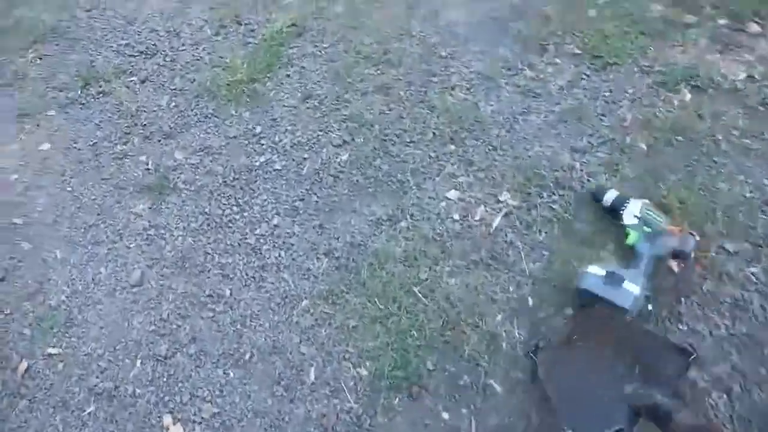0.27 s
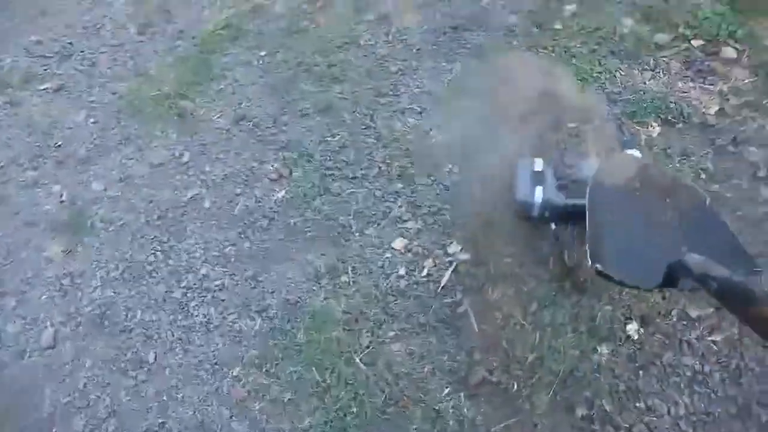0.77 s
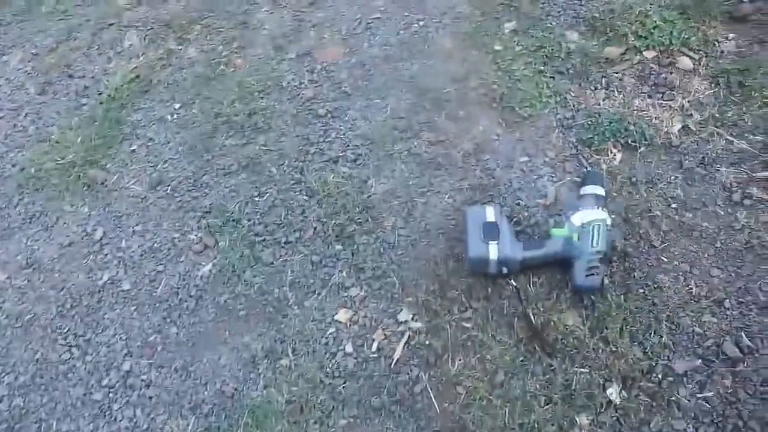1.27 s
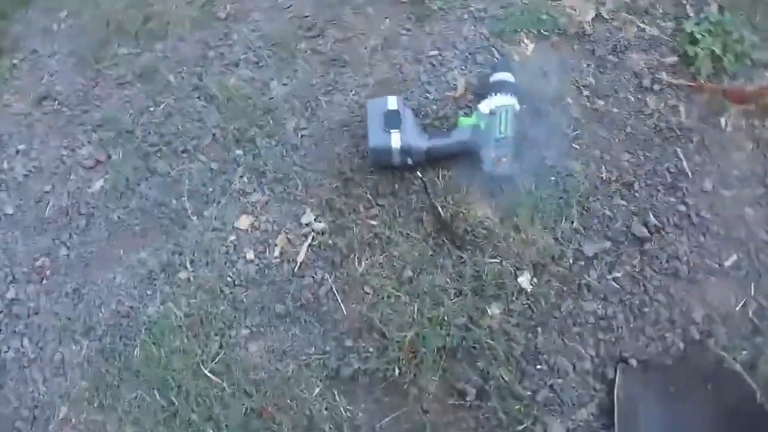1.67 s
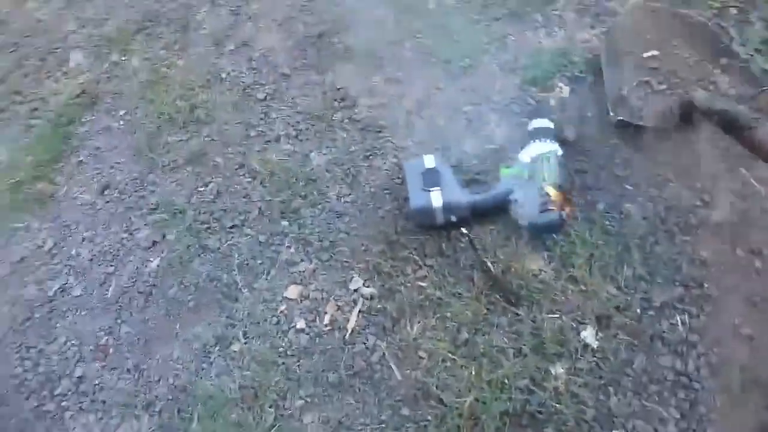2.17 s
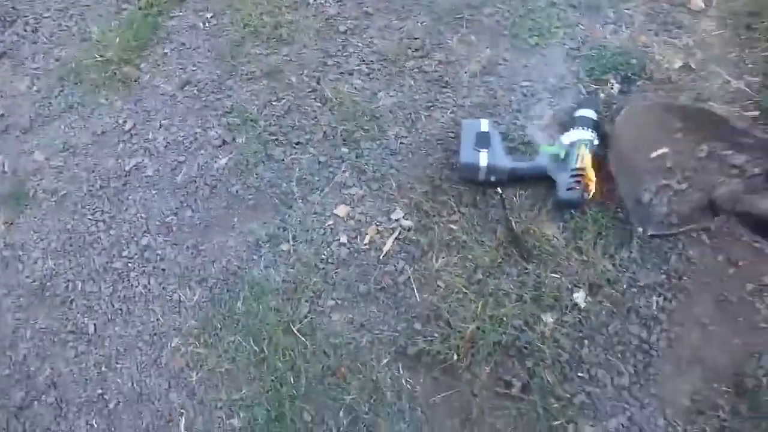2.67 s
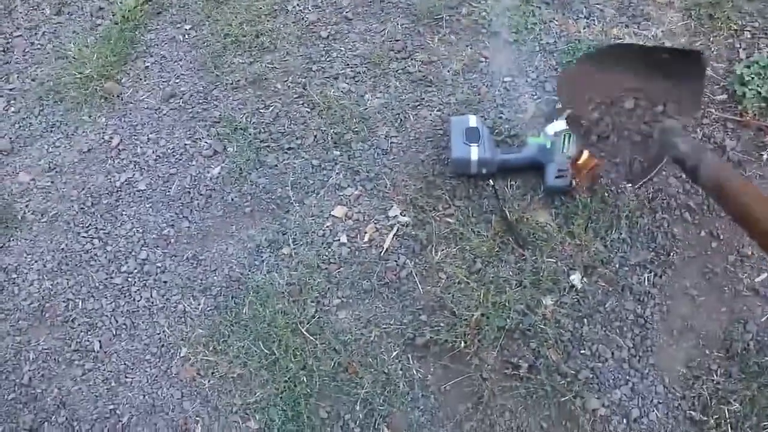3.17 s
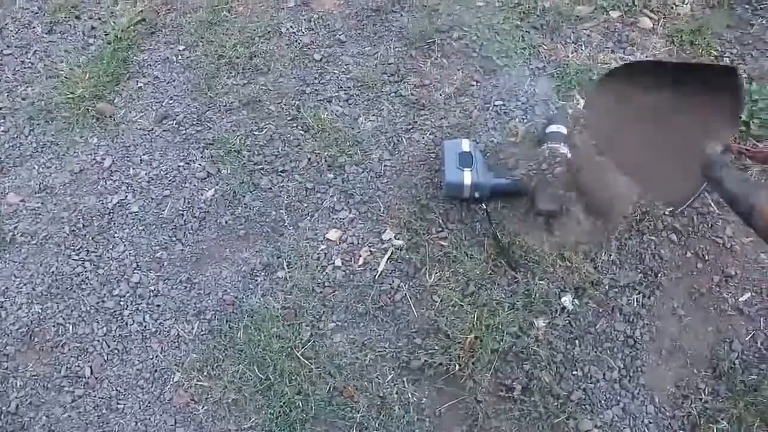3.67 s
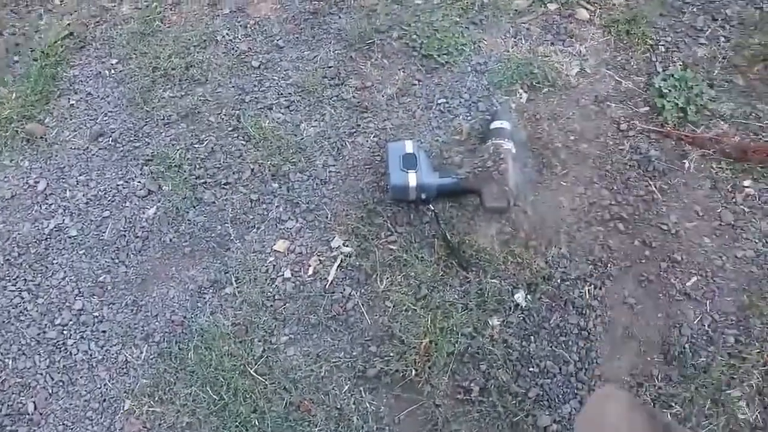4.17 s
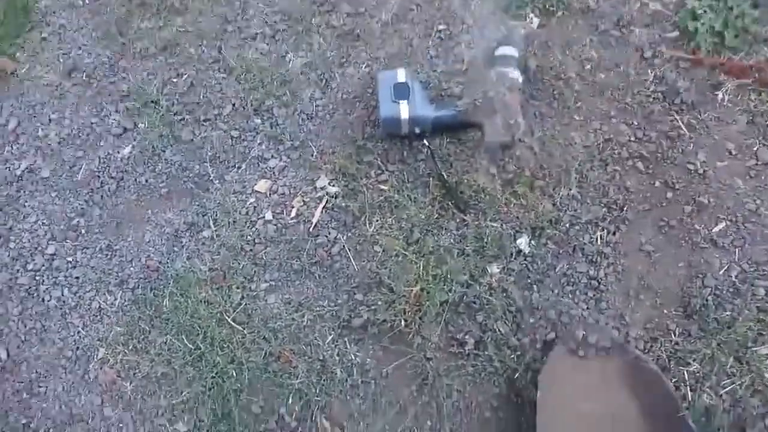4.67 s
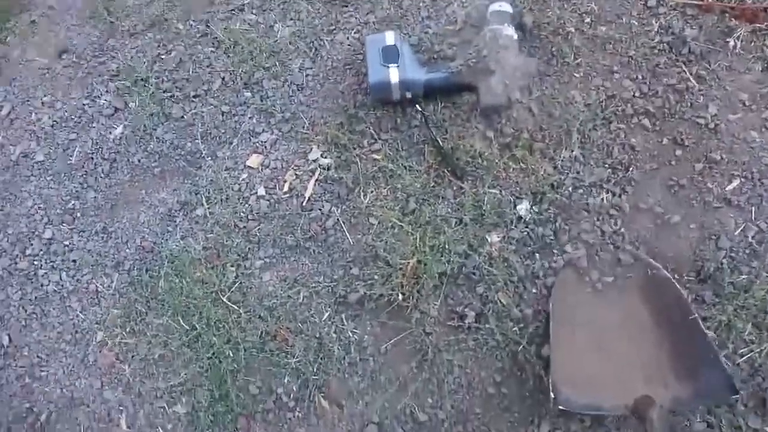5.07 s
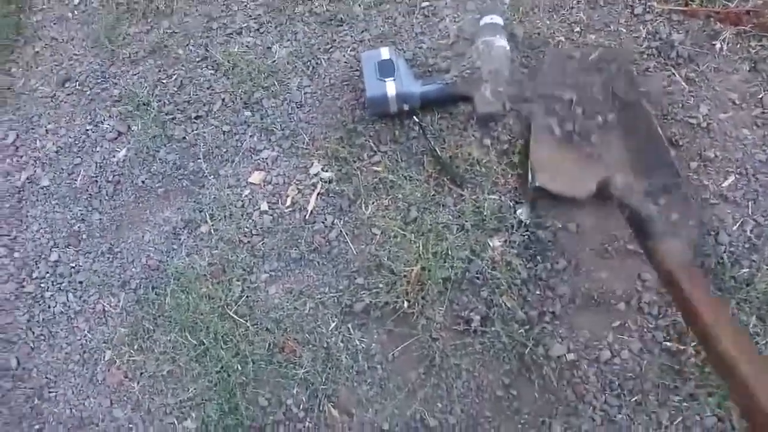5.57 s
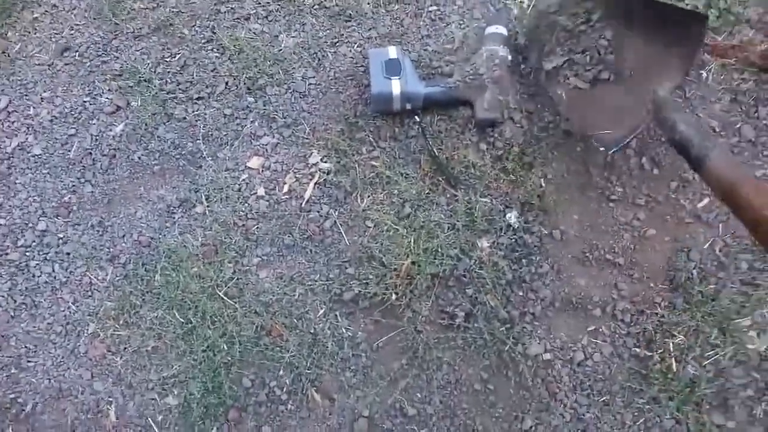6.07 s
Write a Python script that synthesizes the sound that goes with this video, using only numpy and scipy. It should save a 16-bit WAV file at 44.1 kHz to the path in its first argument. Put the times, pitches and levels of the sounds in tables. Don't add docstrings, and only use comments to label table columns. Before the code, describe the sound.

Close up in a quiet yard, soft soil thuds lead into a sharp clank as a steel shovel hits a hard object. Dirt spills, then the blade grinds and clatters through gravel. After a lull of crunching soil, ticking pebbles and a faint metallic ring, harder thrusts bite the ground, ending in a loud scraping clang and a thin trickle. Wind gently buffets the microphone.

```python
import sys
import numpy as np
from scipy import signal
from scipy.fft import rfft, irfft
from scipy.io import wavfile

SR = 44100
rng = np.random.default_rng(int(sys.argv[2]) if len(sys.argv) > 2 else 0)


def ratio_of_db(decibels):
    return 10 ** (np.asarray(decibels, float) / 20)


def master_out(mix):
    frames = np.transpose(np.atleast_2d(mix))
    ceiling = np.clip(frames, -1, 1)
    pcm = np.round(ceiling * 32767).astype(np.int16)
    wavfile.write(sys.argv[1], SR, pcm)


N = 278037


# (time [s], peak level [dB], burst t60 [s], grit against peak [dB])
STONE_JAMS = [(0.395, -19.5, 0.082, -2), (0.433, -16.5, 0.13, -9), (0.455, -11.5, 0.037, -13),
              (0.494, -17.5, 0.078, 1), (0.966, -27, 0.18, -20), (1.011, -27, 0.062, -14),
              (1.371, -20, 0.029, -12.5), (1.463, -25, 0.27, 1.5), (1.535, -5, 0.0072, -25),
              (1.562, -9, 0.079, -7.5), (1.597, -13, 0.22, -8.5), (1.643, -11, 0.022, 3),
              (1.72, -15, 0.099, -20), (1.74, -17, 0.039, -7), (0.584, -19.5, 0.056, -28),
              (0.639, -26, 0.058, -22), (0.994, -33, 0.025, -2), (2.174, -24, 0.017, 12),
              (1.816, -21, 0.13, -16.5), (1.867, -12, 0.024, -14), (1.888, -11, 0.074, -8),
              (1.95, -9, .15, -15.5), (2.022, -8.5, 0.082, -13.5), (2.056, -20.5, 0.18, 0.5),
              (2.277, -32, 0.045, 9), (2.686, -26, 0.053, -9.5), (3.511, -45, 0.066, 8),
              (3.631, -38, 0.012, 2), (4.568, -6.5, 0.16, -8), (4.607, -7, 0.05, -2.5),
              (4.652, 2, 0.014, -6.5), (4.739, -12.5, 0.013, -1.5), (4.948, -26, 0.08, -9),
              (4.993, -4, 0.05, -19), (5.039, -4, 0.088, -8), (5.574, 0.5, 0.062, -9.5),
              (5.552, -14.5, .05, -9.5), (5.646, -12, 0.02, -6.5), (5.828, -42, 0.083, 14),
              (5.858, -41, 0.18, 6.5), (5.887, -29.5, 0.12, -5), (2.102, -13, 0.035, -6),
              (4.664, -10.5, .03, 0)]
# (time [s], peak level [dB], burst t60 [s])
SOIL_JOLTS = [(0.091, -31.5, 0.099), (0.107, -28, 0.4), (0.3426, -5, 0.089), (0.408, -3, 0.0081),
              (0.528, -12, 0.075), (0.769, -13, 0.025), (0.791, -16, 0.0066), (0.833, -35.5, 0.038),
              (.857, -37, 0.062), (0.986, -17.5, 0.081), (1.079, -25, 0.05), (1.147, -13, 0.0079),
              (2.715, -38.5, 0.062), (2.759, -25, 0.19), (3.58, -21, 0.012), (3.659, -16.5, 0.019),
              (4.98, -22, 0.025), (5.484, -19.5, 0.03), (5.509, -9, 0.07), (5.587, 6.5, 0.046),
              (5.618, 0.5, 0.07), (5.682, -1.5, 0.1), (5.724, 3, 0.022), (5.803, -7, 0.017)]
# (start [s], swell [s], fade [s], peak level [dB], steel against soil [dB])
SLIDES = [(.095, 0.03, 0.38, -39, -24), (.19, 0.077, 0.3, -64, 5), (.397, 0.14, 0.096, -37, 2.5),
          (.57, 0.091, 0.32, -43, -2.5), (.78, 0.11, 0.2, -42.5, -22), (.96, 0.035, 0.95, -52.5, -19),
          (1.37, 0.02, 0.097, -36.5, -14), (1.45, 0.21, 0.19, -37, 5), (1.68, 0.06, 0.021, -41, -2),
          (1.78, 0.12, 0.68, -34, -5.5), (1.95, 0.11, 0.38, -35.5, 15), (2.16, 0.019, 0.24, -57, 9.5),
          (2.44, 0.12, 0.98, -50, -10), (2.67, 0.087, 0.2, -37, -23), (2.85, 0.27, 1, -53.5, -18.5),
          (3.345, 0.22, 0.68, -53.5, -1), (3.51, 0.036, 0.45, -57.5, 3), (4.68, 0.029, 1, -50.5, 3),
          (5.1, 0.013, 0.22, -49.5, -11), (5.28, 0.048, 0.17, -50.5, -11.5), (5.4, 0.083, .05, -54.5, -3),
          (5.75, 0.05, 0.17, -38.5, 0), (5.9, 0.069, 0.13, -51, -4.5), (6.0, 0.056, 0.39, -55, -21)]
# (start [s], swell [s], fade [s], peak level [dB], steel against soil [dB])
THRUSTS = [
    (4.57, 0.028, 0.056, -20, 1),
    (4.982, 0.072, 0.034, -23, 0.5),
    (5.485, 0.127, 0.14, -26, -2.5),
]
# (frequency [Hz], density [dB per Hz])
SOIL_COLOUR = [(71, -22.5), (120, -38), (216, -19), (255, -1), (348, 5.5), (870, -3.5), (1060, 4),
               (6000, -22.5), (7800, -66), (13200, -120)]
# (frequency [Hz], density [dB per Hz])
GRIT_COLOUR = [(1470, -30.5), (2500, 1.5), (4290, -2), (4750, -1), (7350, -5), (8870, -8.5), (15300, -15),
               (16300, -29.5)]


def shovel():
    judder = ratio_of_db(2.9 * drift(65))
    sliding = strokes(SLIDES, swell_db=11, fade_db=39.5, release_s=0.084)
    sliding = sliding + strokes(THRUSTS, swell_db=10.5, fade_db=5.5, release_s=0.011)
    on_steel, on_soil, on_grit = sliding
    steel_share = (on_steel + 1e-9) / (on_steel + on_soil + 2e-9)

    jolt_grit_db = -25
    impacts = STONE_JAMS + [(*jolt, jolt_grit_db) for jolt in SOIL_JOLTS]
    s, peak_db, t60, bright_db = np.transpose(impacts)
    pressure = judder * (on_steel + on_soil) + bursts(s, peak_db - 13.5, t60, rise_s=0.0018)
    grit_pressure = judder * on_grit + bursts(s, peak_db + bright_db - 5.0, t60, rise_s=0.00056)

    force = pressure * steel_share * grains(per_s=3000, spread_db=4.5, smooth=0.88)
    is_free = np.searchsorted((4.56, 5.3), np.arange(N) / SR) != 1
    steel = loaded_blade(force) + ratio_of_db(-36.0) * empty_blade(force * is_free)

    crunch = pressure * (1 - steel_share) * grains(per_s=1800, spread_db=4.5, smooth=0.56)
    soil = patchy(colour(crunch, SOIL_COLOUR), 100, 9000, count=10, patchy_db=1.4, rate=18)
    hiss = grit_pressure * grains(per_s=17000, spread_db=4.0, smooth=1.0)
    grit = patchy(colour(hiss, GRIT_COLOUR), 1500, 17320, count=14, patchy_db=1.5, rate=130)
    return steel + soil + grit


def strokes(table, swell_db, fade_db, release_s):
    out, t = np.zeros((3, N)), np.arange(N) / SR
    for start, swell, fade, db, steel_db in table:
        corners = start + np.cumsum([-.002, .002, max(swell, .003), max(fade, .01), release_s])
        corner_db = [-90, -swell_db, 0, -fade_db, -fade_db - 50]
        level = ratio_of_db(db + np.interp(t, corners, corner_db, right=-120))
        grit_share = ratio_of_db(0.78 * steel_db)
        out += np.outer([*shares(steel_db), grit_share], level)
    return out


def shares(steel_db):
    steel = 1 / (1 + ratio_of_db(-steel_db - 3))
    return steel, 1 - steel


def bursts(times, levels_db, t60s, rise_s):
    out = np.zeros(N)
    for s, db, t60 in zip(times, levels_db, np.clip(t60s, .004, .4)):
        start = round(s * SR)
        t = np.arange(min(round(t60 * SR), N - start)) / SR
        out[start:][:len(t)] += ratio_of_db(db - 60 * t / t60) * (1 - np.exp(-t / rise_s))
    return out


# (frequency [Hz], width [Hz], level [dB])
LOADED_MODES = [(435, 60, -8), (640, 50, 1), (935, 40, 0), (1180, 70, -10), (1385, 45, -1), (1458, 35, -3),
                (1620, 30, -9), (1905, 45, -3), (1998, 45, -4), (2115, 45, -3), (2295, 40, -8),
                (2644, 50, -10), (2900, 40, -9), (3085, 35, -9), (3443, 40, -6), (3660, 70, -10),
                (3834, 40, -10), (4230, 90, -9), (5140, 180, -12), (5900, 200, -14), (7300, 300, -16)]


def loaded_blade(force):
    out, power = 0, 0
    for k, (hz, width_hz, db) in enumerate(LOADED_MODES):
        r = np.exp(-np.pi * max(width_hz, 10) / SR)
        b = (1 - r * r) / 2 * np.array([1, 0, -1])
        a = [1, -2 * r * np.cos(2 * np.pi * hz / SR), r * r]
        drive = np.roll(force, 7 * k) * ratio_of_db(3.0 * drift(13))
        out = out + ratio_of_db(db) * (-1) ** k * signal.lfilter(b, a, drive)
        power += ratio_of_db(db) ** 2 * (1 - r * r) / 2
    return out / np.sqrt(power)


# (frequency [Hz], level [dB], t60 [s])
FREE_MODES = [(226, -13, .3), (620, -5, .3), (931, 0, .26), (1230, -11, .3), (1385, -8, .18),
              (1460, -9, .18), (1615, -12, .25), (1857, -7, .3), (1908, -3, .32), (2116, -5, .28),
              (2186, -9, .33), (2288, -10, .3), (2640, -14, .22), (2895, -13, .28), (3144, -12, .22),
              (3450, -13, .18), (3820, -20, .18), (4230, -18, .18)]


def empty_blade(force):
    return sum(ring(force * ratio_of_db(db + 2.5 * drift(9)), hz, .5 * t60) for hz, db, t60 in FREE_MODES)


def ring(force, hz, t60):
    r, w = ratio_of_db(-60 / (t60 * SR)), 2 * np.pi * hz / SR
    return signal.lfilter([0, np.sin(w)], [1, -2 * r * np.cos(w), r * r], force + 1e-18)


# (time [s], peak level [dB], ring length [share], place: belly + or rim - [dB], knock level [dB])
CLANKS = [(.344, -11.5, 1, 3, 18.5), (.405, -1.5, 0.41, -3, -20), (.456, -8, 1, -8.5, -14),
          (.494, -21, 0.65, 5, -12.5), (1.565, -17, 0.53, 6, -6.5), (1.645, -23, 0.19, 6, -17),
          (2.026, 2.5, 0.24, -2, -9), (2.059, 0.5, 0.48, -1.5, -28.5), (2.189, -14, 1.0, -39, -18),
          (2.279, -12, 0.36, -21, -16), (2.346, -27, 0.82, -26, -18.5), (3.022, -31.5, 0.68, 2, 4.5),
          (3.179, -34, 0.7, -6, -5), (3.407, -31, 0.78, -4, -19.5), (3.579, -28, 0.4, -7, 7),
          (3.662, -24.5, 0.81, -1.5, -2.5), (4.017, -42.5, 0.37, 4, -0.5), (4.608, -10.5, 0.24, 4.5, 16),
          (4.65, -24, 0.18, 6, -22), (5.084, -25, 0.25, -3, -11), (5.59, 4, 0.52, -16, -26),
          (5.62, 0, 1, -26, 1), (5.683, -5, 0.31, -2, -1.5), (5.802, -9.5, 0.41, -13, 1.5)]
# (frequency [Hz], level [dB], t60 [s])
NECK_MODES = [(736, -12.5, 0.0028), (1100, -9.5, 0.0083), (2094, 11.5, 0.01), (2610, -4, 0.0081)]


def clanks():
    out, t = np.zeros(N + SR), np.arange(round(.3 * SR))[:, None] / SR
    time = t[:, 0]
    ring_rise = 1 - np.exp(-time / 0.0022)
    knock_rise = 1 - np.exp(-time / 0.000043)
    fade_out = np.cos(time / time[-1] * np.pi / 2)
    region = np.searchsorted([1100, 1700], np.transpose(FREE_MODES)[0])
    place_share, place_base_db = np.array([1, 0.037, 0]), [-3.5, 1.5, -2.5]
    chances = rng.standard_normal((len(CLANKS), len(FREE_MODES)))
    for (s, db, share, place_db, knock_db), chance in zip(CLANKS, chances):
        lean_db = (place_share * place_db + place_base_db)[region]
        ringing = struck(FREE_MODES, t, np.clip(share, .05, 1.3), db - 21.0 + lean_db + 4.7 * chance)
        knock = struck(NECK_MODES, t, 0.69, db - 25.0 + knock_db + 6.7 * chance[:len(NECK_MODES)])
        out[round(s * SR):][:len(t)] -= (ringing * ring_rise + knock * knock_rise) * fade_out
    return out[:N]


def struck(modes, t, share, offsets_db):
    hz, db, t60 = np.transpose(modes)
    decay = ratio_of_db(db + offsets_db - 60 * t / (t60 * share))
    return (decay * np.sin(2 * np.pi * hz * t)).sum(axis=1)


# (time [s], peak level [dB], pitch [Hz])
FIRST_BLOW = [
    (.3439, 1, 930),
]
# (time [s], peak level [dB], pitch [Hz])
SNAPS = [
    (.406, -16, 1900),
    (.433, -12, 1300),
    (.457, -12, 1480),
    (.495, -11.5, 2660),
    (1.949, -11.5, 1500),
    (2.03, -15, 2020),
    (3.633, -31, 2500),
    (4.589, -11, 1500),
    (4.607, -11, 2530),
    (4.995, -20, 1240),
]
# (time [s], peak level [dB], pitch [Hz])
CLODS = [(0.09, -35, 1090), (.09, -40.5, 2110), (0.11, -30, 398), (0.391, -20, 940), (0.772, -22, 1060),
         (.782, -24, 880), (0.792, -21.5, 720), (.793, -27.5, 1860), (0.812, -43, 1160), (.832, -32, 940),
         (0.962, -26.5, 764), (1.011, -28, 1090), (1.024, -30.5, 940), (1.078, -37, 1100),
         (1.146, -47, 275), (2.415, -43.5, 230.3), (2.481, -40, 227), (2.512, -37.5, 205),
         (2.559, -41.5, 271), (2.685, -29.5, 485), (2.716, -26, 670), (2.762, -27.5, 920),
         (2.842, -36.5, 1380), (3.021, -33.5, 345), (3.229, -45, 262), (3.514, -41, 710), (3.58, -30, 999),
         (4.311, -42.5, 530), (5.801, -16, 883), (6.041, -45.5, 262)]
# (time [s], peak level [dB], pitch [Hz])
PEBBLES = [(0.7044, -47, 5500), (0.7214, -58.5, 3340), (1.1074, -52, 4870), (1.2171, -56, 4070),
           (1.266, -57, 6500), (1.303, -55, 6960), (1.3139, -56, 4040), (1.337, -54, 7060),
           (2.418, -53, 4500), (2.455, -59, 4800), (2.59, -53, 2980), (2.827, -46, 5500),
           (2.832, -54, 8000), (2.855, -57, 7500), (2.9, -56, 6460), (2.925, -57, 5500),
           (2.933, -64.5, 7600), (2.995, -63, 8400), (3.034, -53.5, 2980), (3.265, -57, 8050),
           (3.81, -55.5, 2530), (3.865, -63.5, 5000), (3.878, -55, 8500), (1.3294, -56, 3580),
           (1.3488, -50, 6170), (2.8694, -52, 3900), (3.1023, -50.5, 4230), (3.1517, -52, 2850),
           (3.2146, -52.5, 3740), (3.406, -53, 4930), (3.454, -41, 3350), (3.519, -38.5, 3730),
           (3.633, -46, 1210), (3.736, -49, 8840), (3.765, -51.5, 9000), (3.7744, -61.5, 3640),
           (3.8931, -59, 8550), (3.907, -54, 7580), (4.0168, -58, 3044), (5.2291, -58.5, 4830),
           (6.145, -69, 6870), (6.163, -64, 6940), (6.205, -69, 6500), (6.206, -64.5, 1980),
           (6.22, -64, 5460), (6.268, -69, 6580), (6.296, -63.5, 2490)]


def taps(table, cycles, crack_db):
    out = np.zeros(N)
    t = np.arange(round(.06 * SR)) / SR
    for (s, db, hz), noise in zip(table, rng.standard_normal((len(table), len(t)))):
        tone = np.sin(2 * np.pi * hz * t) + np.sin(2 * np.pi * 1.2 * hz * t)
        crack = np.convolve(noise, tone[:round(SR / hz / 2)], "same") * hz / SR * 4
        piece = (tone + ratio_of_db(crack_db) * crack) * ratio_of_db(db - 60 * t * hz / cycles)
        piece *= 1 - np.exp(-t * hz / 1.15)
        piece = signal.lfilter(*signal.butter(2, .4 * hz, "high", fs=SR), piece)
        start = round(s * SR)
        out[start:][:len(t)] += piece[:N - start]
    return out


# (time [s], level [dB], length [s], pitch [Hz])
DRAGS = [(.4095, -22, .0035, 2070), (.4335, -26, 0.0029, 2700), (.4595, -23.5, 0.0047, 2070),
         (.4605, -19.5, 0.0034, 929), (.4985, -22, 0.0054, 1920), (.5335, -30, 0.0055, 880),
         (1.571, -24, 0.0046, 941), (1.606, -25, 0.0029, 2015), (1.651, -37.5, 0.016, 653),
         (1.901, -35.5, .014, 1350), (1.968, -25.5, 0.021, 1389), (1.971, -30, .007, 3775),
         (2.033, -17, .01, 2134), (2.034, -28, .0065, 410), (2.065, -22, .006, 2167),
         (2.066, -22.5, .0065, 923), (2.076, -26, .0085, 3785), (2.106, -27.5, .02, 1421),
         (2.221, -37.5, 0.011, 3670), (4.591, -27, 0.0049, 1027), (4.613, -15.5, 0.005, 4305),
         (4.656, -25.5, 0.0057, 2055), (4.671, -28.5, 0.008, 671), (5.001, -35, 0.0033, 640),
         (5.044, -21, 0.007, 916), (5.046, -20.5, 0.0067, 644), (5.086, -25, 0.0086, 1380),
         (5.529, -33.5, .0075, 994), (5.578, -14.5, .0043, 1999), (5.581, -18.5, 0.0055, 3463),
         (5.593, -13, 0.0034, 1943), (5.601, -16, .005, 974), (5.624, -13, 0.0041, 919),
         (5.627, -16.5, 0.004, 1867), (5.651, -17, 0.0051, 1937), (5.652, -15.5, 0.0053, 908),
         (5.685, -14.5, 0.0024, 1004), (5.686, -19.5, .0041, 1998), (5.728, -21, 0.0075, 1953),
         (5.736, -22, 0.003, 1034), (5.806, -21.5, 0.0048, 2110), (5.807, -22.5, 0.002, 1013),
         (5.906, -44, 0.014, 2087), (5.601, -24, .01, 3487), (.361, -23, 0.0092, 934),
         (1.491, -36, 0.0053, 910), (5.621, -12.5, .0023, 1377), (2.061, -19, .0041, 2870),
         (4.96, -47.5, 0.011, 935), (.548, -33, 0.016, 2134)]
# (time [s], level [dB], length [s], pitch [Hz])
SCUFFS = [(2.456, -54, 0.02, 472), (2.482, -40, 0.0065, 552), (2.498, -67, .0041, 752),
          (2.514, -40.5, 0.0048, 665), (2.571, -56, .014, 635), (2.701, -43, .011, 902),
          (2.731, -43.5, 0.018, 670), (2.785, -41, 0.012, 1020), (2.631, -47.5, 0.0077, 1305),
          (1.391, -44, .014, 925), (1.746, -35.5, 0.0067, 660)]
# (time [s], level [dB], length [s], pitch [Hz])
STREAKS = [
    (2, -42, .029, 226),
    (2.25, -45, .03, 226),
    (3.38, -57, .018, 2190),
    (3.47, -55, .03, 2190),
    (3.445, -57, .03, 3450),
    (.645, -44, .012, 2250),
    (3.05, -52, .014, 1908),
    (2.9, -56, .017, 935),
    (6.14, -60, .01, 1267),
    (6.07, -63, .013, 2700),
]


def drags(table, width):
    lead = 2205
    out, t = np.zeros(N + SR), np.arange(-lead, 4410) / SR
    slower_fall = np.where(t > 0, 1.72, 1)
    for (s, db, length, hz), noise in zip(table, rng.standard_normal((len(table), len(t)))):
        pair = hz * (1 + np.clip(width, .02, .5)) ** np.array([-.5, .5])
        band = signal.butter(2, pair, "band", fs=SR, output="sos")
        shape = np.exp(-.5 * (t / max(length, .001) / slower_fall) ** 2)
        out[round(s * SR) - lead:][:len(t)] += ratio_of_db(db - 6) * shape * rms_one(signal.sosfilt(band, noise))
    return out[:N]


# (struck [s], damped [s], level [dB], t60 [s])
SINGING = [
    (3.65, 4.04, -52, 1.5),
    (4.01, 4.4, -68, 2.0),
]
# (start [s], stop [s], frequency [Hz], level [dB])
FAINT_PARTNERS = [
    (4.02, 4.30, 609, -81),
    (4.0, 4.33, 4269, -85),
]


def singing():
    t, out = np.arange(N) / SR, 0
    tones = [(start, stop, 1337.5, db, t60) for start, stop, db, t60 in SINGING]
    tones += [(*partner, 9.0) for partner in FAINT_PARTNERS]
    for start, stop, hz, db, t60 in tones:
        gate = np.clip(np.minimum(t - start, stop - t) / .03, 0, 1)
        out = out + ratio_of_db(db - 60 * np.abs(t - start) / t60) * gate * np.sin(2 * np.pi * hz * t)
    return out


# (delay [s], level [dB])
ECHOES = [(.004, -26), (0.02, -17.5), (0.042, -31)]


def echoes(x):
    dull = signal.lfilter([.45], [1, -.55], x)
    return sum(ratio_of_db(db) * np.pad(dull, (round(s * SR), 0))[:N] for s, db in ECHOES)


# (time [s], level [dB], rise for 20 dB [s], fall for 20 dB [s])
GUSTS = [(.36, -48, 0.32, 0.2), (.63, -50, 0.087, 0.1), (1.02, -48.5, 0.044, -1.94),
         (1.299, -45.5, 0.057, -1.5), (1.46, -41, 0.27, 0.33), (2.03, -59, 0.42, 0.4),
         (2.25, -73, 0.064, 3.9), (3.43, -64, 0.066, -0.5), (4.62, -56.5, 0.059, 0.5),
         (4.819, -56, 0.37, 0.4), (5.1, -51.5, 0.15, 0), (5.32, -64.5, 0.058, -0.3),
         (5.6, -54.5, 0.057, 0.2), (6.047, -50.5, 0.014, 0)]
# (frequency [Hz], density [dB per Hz])
GUST_COLOUR = [(8.8, -36), (15, -6), (59, 0), (97, 0), (146, -5), (290, -19), (330, -20), (430, -50),
               (730, -120)]


def wind():
    t = np.arange(N) / SR
    level = ratio_of_db(-83)
    for s, db, rise, fall in GUSTS:
        away = np.maximum((s - t) / max(rise, .02), (t - s) / max(fall, .02))
        level = level + ratio_of_db(db - 20 * away)
    return level * ratio_of_db(3.0 * drift(22)) * colour(rng.standard_normal(N), GUST_COLOUR + [(600, -70)])


# (frequency [Hz], density [dB per Hz])
YARD_COLOUR = [(35, -28), (60, -9), (300, -8), (560, -3), (900, -9), (1500, -14), (4000, -22), (14400, -28),
               (16200, -40)]


def yard():
    return ratio_of_db(-73 + .8 * drift(1.2)) * colour(rng.standard_normal(N), YARD_COLOUR)


def rms_one(x):
    return x / np.sqrt(np.mean(x ** 2) + 1e-20)


def colour(x, points):
    size = 4096
    hz = np.maximum(np.arange(size // 2 + 1) * SR / size, 1)
    point_hz, point_db = np.array(points).T
    log_gain = np.log(ratio_of_db(np.interp(np.log(hz), np.log(point_hz), np.clip(point_db, -90, 20))))
    cepstrum = irfft(log_gain)
    cepstrum[1:size // 2] *= 2
    cepstrum[size // 2 + 1:] = 0
    pulse = irfft(np.exp(rfft(cepstrum)))
    return signal.fftconvolve(x, pulse / np.sqrt(np.sum(pulse ** 2)))[:N]


def drift(rate):
    r = np.exp(-64 * np.pi * rate / SR)
    noise = rng.standard_normal(N // 32 + 1002)
    slow = signal.lfilter([1], [1, -2 * r, r * r], noise)[1000:]
    return np.interp(np.arange(N) / 32, np.arange(len(slow)), rms_one(slow))


def grains(per_s, spread_db, smooth):
    sizes = ratio_of_db(spread_db * np.minimum(rng.exponential(1, N), 4.0)) * rng.choice([-1, 1], N)
    clicks = rms_one(sizes * (rng.random(N) < per_s / SR))
    return rms_one(clicks + smooth * rng.standard_normal(N))


def patchy(x, low_hz, high_hz, count, patchy_db, rate):
    edges = np.geomspace(low_hz, min(high_hz, .45 * SR), count + 1)
    out = 0
    for pair in zip(edges, edges[1:]):
        band = signal.sosfilt(signal.butter(2, pair, "band", fs=SR, output="sos"), x)
        out = out + band * ratio_of_db(patchy_db * drift(rate))
    return out


def scene():
    near = shovel() + clanks()
    near = near - taps(FIRST_BLOW, cycles=7.2, crack_db=-16.5)
    near = near + taps(SNAPS, cycles=7.4, crack_db=7.0)
    near = near + taps(CLODS, cycles=11.7, crack_db=9.5)
    near = near + taps(PEBBLES, cycles=47, crack_db=3.0)
    near = near + drags(DRAGS, width=0.082) + drags(SCUFFS, width=0.44) + drags(STREAKS, width=0.026)
    near = signal.sosfilt(signal.butter(3, 175, "high", fs=SR, output="sos"), near)
    return (near + echoes(near) + singing() + wind() + yard())[None]


def top_cut(x):
    return signal.sosfilt(signal.butter(12, 16620, fs=SR, output="sos"), x)


def record(dry):
    dry = signal.sosfilt(signal.cheby2(10, 60, 16750, fs=SR, output="sos"), dry)
    mix = 1.342 * np.tanh(dry / 1.11)
    return top_cut(mix)


dry = scene()
out = record(dry)
master_out(out)
```